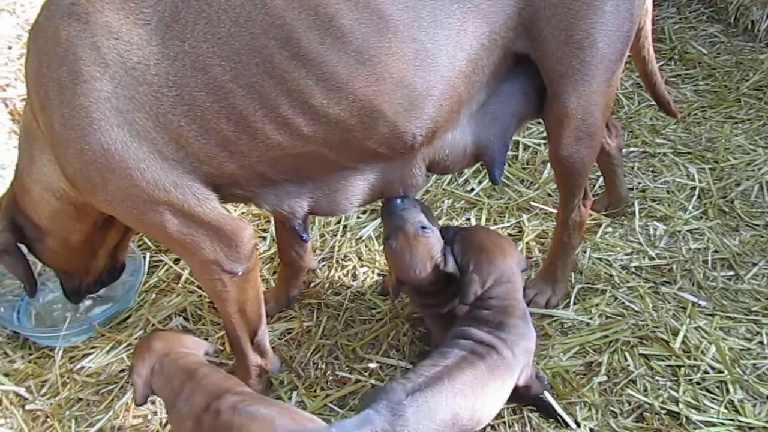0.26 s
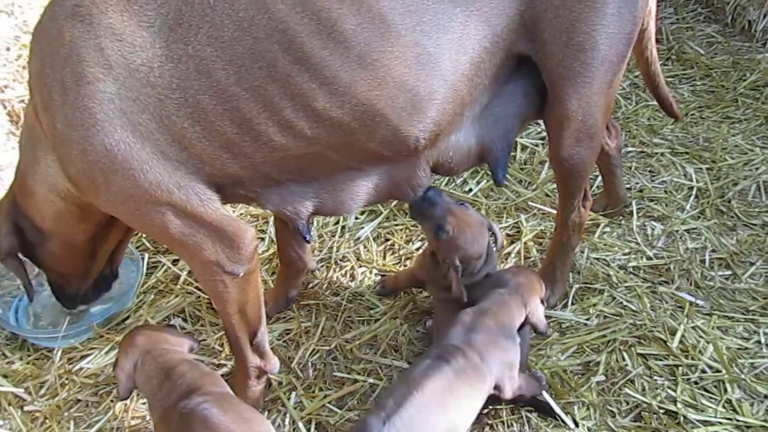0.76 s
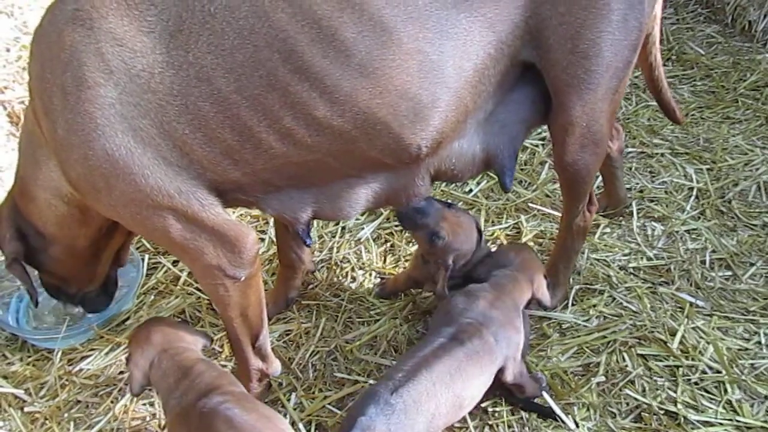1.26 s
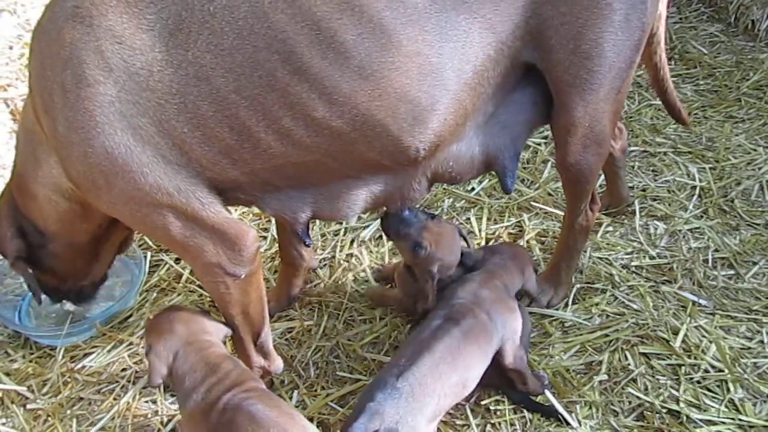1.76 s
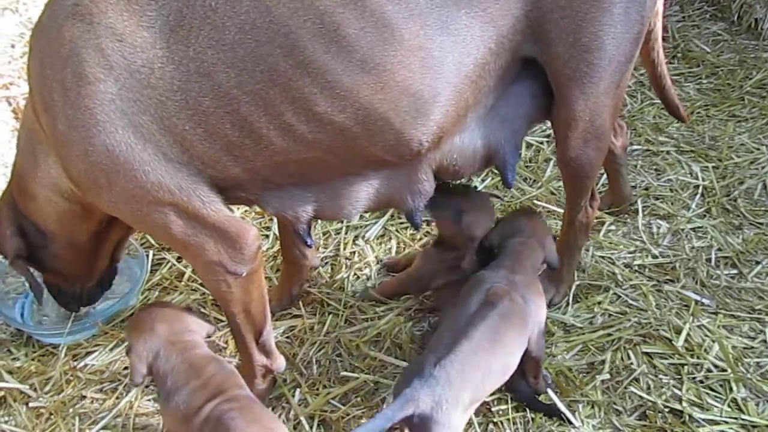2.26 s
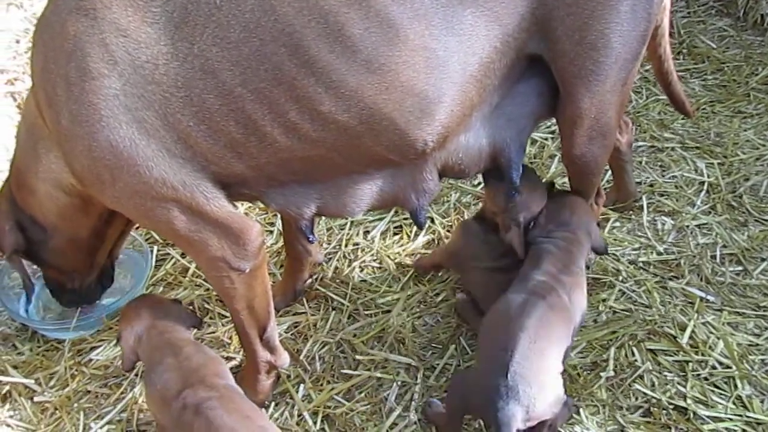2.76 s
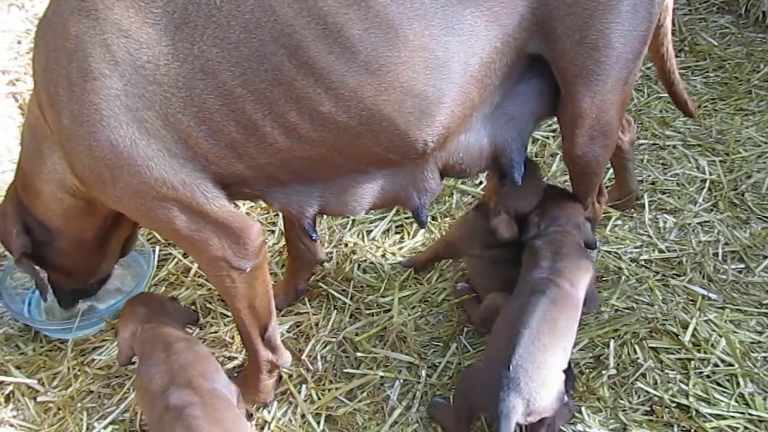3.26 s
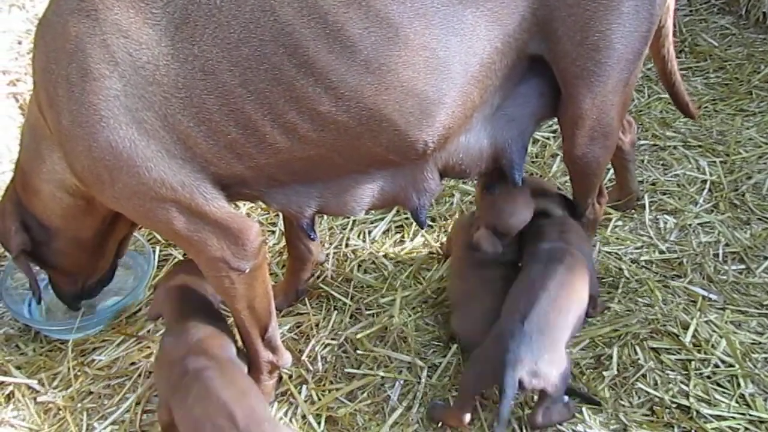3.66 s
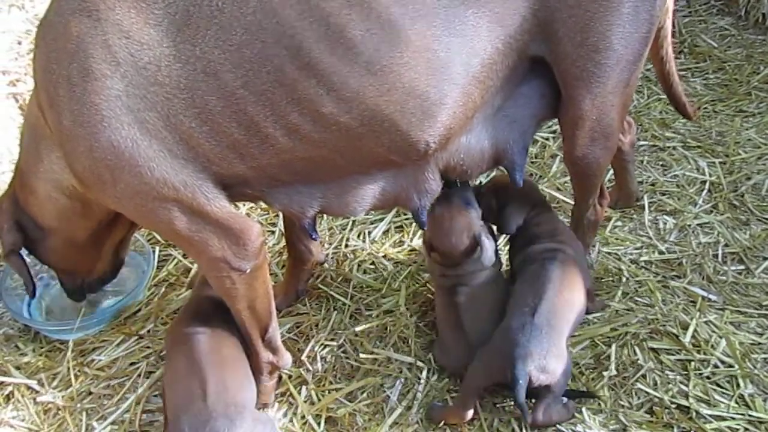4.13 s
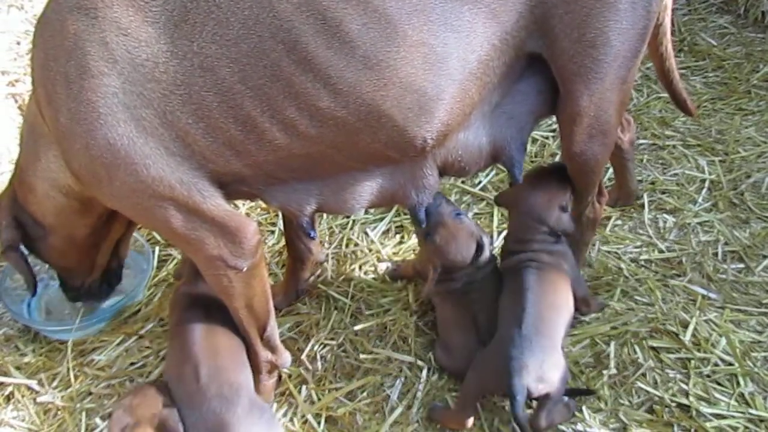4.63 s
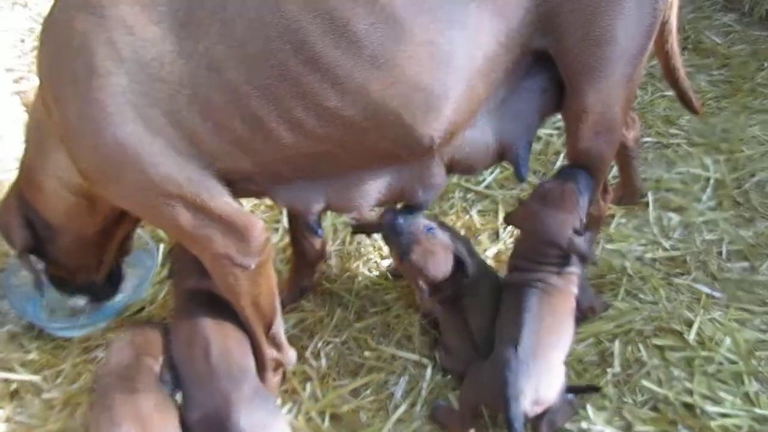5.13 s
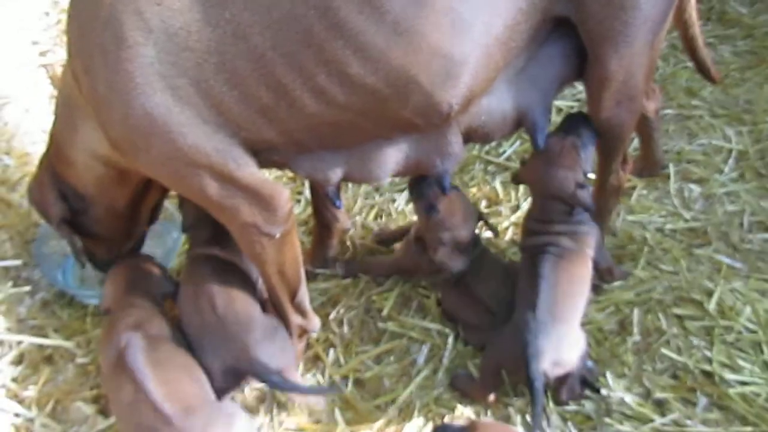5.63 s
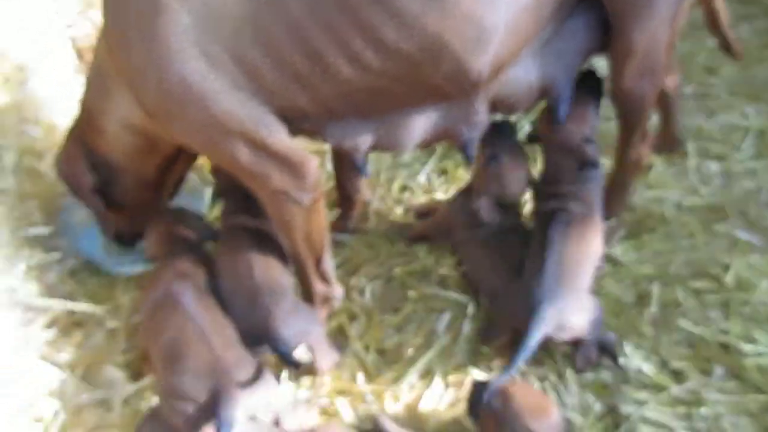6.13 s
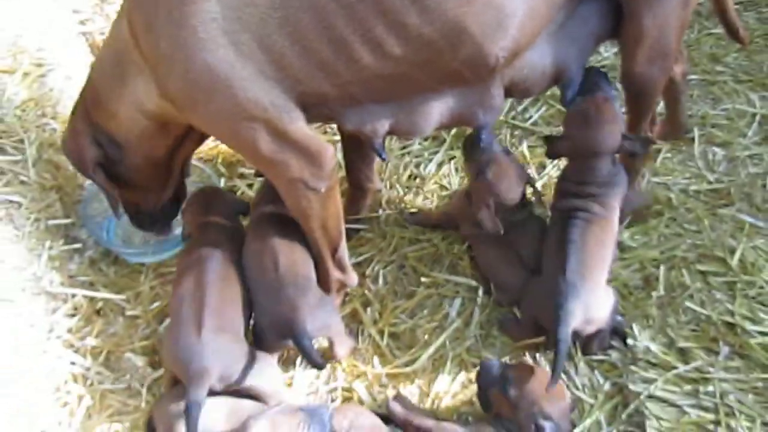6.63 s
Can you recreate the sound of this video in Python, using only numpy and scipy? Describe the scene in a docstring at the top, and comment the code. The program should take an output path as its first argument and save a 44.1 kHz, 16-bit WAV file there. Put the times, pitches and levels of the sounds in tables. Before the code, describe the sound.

A dog laps water from a plastic bowl, close and slightly left of centre, in a dry straw-bedded shed. Drinking is already under way at 0 s, with crisp splashes and plops at 0.1-0.25 s, then a short lull. From about 0.5 s laps come roughly every 0.35 s to the end: a swelling bubbly slosh with fine spray, then clustered hollow plops, wet slaps and sticky lip smacks, and a faint low gulp. Stronger splashes fall near 0.9, 1.7, 2.9, 4.05, 5.3 and 6.1 s; other laps are lighter, with brief settling between. Thin dry straw rustle from treading puppies flickers across both sides, a bit clearer around 2.6 s and 6.2 s. Soft, slowly swelling air noise lies beneath. After 6.4 s the lapping thins to small bubbling, with a last plop and splash near 6.9 s.

```python
"""Quick wet laps come first: a dog drinks from a plastic bowl in a straw-bedded shed, close to two microphones.
Ringing air pockets make the plops and glugs; shaped noise bursts make the splashes and lip smacks.
A slosh of tiny bubbles and spray swells with every lap, and low pitched pushes mark the mouthfuls.
Behind it, filtered noise gives the rustle of straw under treading puppies and the soft shed air.
"""
import sys
import numpy as np
from scipy import signal
from scipy.fft import rfft, irfft, next_fast_len
from scipy.io import wavfile
from scipy.ndimage import uniform_filter1d

SR = 44100
rng = np.random.default_rng(int(sys.argv[2]) if len(sys.argv) > 2 else 0)


def digitize_waveform(pressure):
    """Quantize a signal to 16-bit integers and store it at the path in sys.argv[1].

    Rows of a 2-D input are taken as channels; values are limited to [-1, 1].
    """
    field = np.atleast_2d(pressure).T
    bounded = np.clip(field, -1, 1)
    quanta = np.round(bounded * 32767).astype(np.int16)
    wavfile.write(sys.argv[1], SR, quanta)


N = 303849


def gain_of(db):
    """Turns dB into an amplitude factor."""
    return 10 ** (np.asarray(db) / 20)


def evened(x):
    """Scales a signal to an RMS of 1."""
    return x / np.sqrt(np.mean(x ** 2) + 1e-20)


def read(points, hz):
    """Reads a (Hz, value) curve on a logarithmic frequency axis."""
    f, value = np.transpose(points)
    return np.interp(np.log(hz + 1), np.log(f + 1), value)


def add(mix, s, sound):
    """Lays a sound into the mix at s seconds, cut off at the end."""
    part = mix[round(s * SR):][:len(sound)]
    part += sound[:len(part)]


def coloured(x, gain):
    """Multiplies the spectrum by gain(Hz)."""
    size = next_fast_len(N + 4096)
    hz = np.fft.rfftfreq(size, 1 / SR)
    return irfft(rfft(x, size) * gain(hz), size)[..., :N]


def burst(ring_s, round_by):
    """Time axis and an envelope of peak 1: it swells for round_by ring times, then dies away."""
    ring_s = np.clip(ring_s, .0002, .012)
    t = np.arange(round(12 * ring_s * SR)) / SR
    shape = (t / ring_s + 1e-9) ** round_by * np.exp(-t / ring_s)
    return t, shape / shape.max()


def pocket(hz, ring_s, round_by, glide, wobble):
    """An air pocket rings as a sine whose pitch glides as it nears the surface and shakes with its wall."""
    t, shape = burst(ring_s, round_by)
    shake = evened(uniform_filter1d(rng.standard_normal(6400), size=60))[:len(t)]
    pitch = hz * (1 + glide * (t / ring_s - 1) + wobble * shake)
    phase = 2 * np.pi * np.cumsum(pitch) / SR
    return shape * np.sin(phase + 2 * np.pi * rng.random())


def puff(ring_s, round_by, ragged_db):
    """Noise under the pocket's kind of envelope, broken into lumps as drops land one after another."""
    shape = burst(ring_s, round_by)[1]
    noise, lumps = rng.standard_normal((2, 6400))
    lumps = gain_of(ragged_db * evened(uniform_filter1d(lumps, size=50)))
    ragged = noise * lumps / np.sqrt(np.mean(lumps ** 2))
    return shape * ragged[:len(shape)]


def grains(low_hz, high_hz, cycles, per_s, spread_db, count):
    """Random tiny pockets: each pitch rings on a differently shifted copy of one sparse, uneven train."""
    out = np.zeros(N)
    chance = rng.random(N)
    size = gain_of(spread_db * np.minimum(rng.exponential(1, N), 5))
    train = size * (chance < per_s / count / SR)
    for hz in np.geomspace(low_hz, high_hz, count):
        shifted = np.roll(train, rng.integers(N))
        ring = pocket(hz, cycles / hz, round_by=0.98, glide=0.0059, wobble=0.021)
        out += signal.oaconvolve(shifted, ring)[:N] * np.sqrt(hz)
    return out


# Air pockets trapped by the tongue, heard as plops and glugs.
# Each row: start in seconds, level in dB, pitch in Hz, ring time in seconds.
POCKETS = [(.0254, -31, 793, .0021), (.1589, -15, 1956, 0.0015), (0.214, -19.5, 2560, 0.00078),
           (0.225, -20.5, 2000, 0.001), (0.249, -40.5, 354, 0.0052), (0.407, -43.5, 2600, 0.0019),
           (0.528, -36.5, 1157, 0.0047), (.5467, -30, 1170, 0.00063), (0.5566, -38, 480, 0.0037),
           (0.5537, -33.5, 1740, 0.0048), (.6161, -30.5, 1720, .003), (0.644, -30, 2470, 0.0015),
           (0.688, -36.5, 340, 0.0049), (0.703, -39, 324, .0048), (.7246, -30, 1450, .0009),
           (0.8728, -31, 2190, 0.0025), (0.874, -23.5, 1340, 0.00064), (0.9013, -28.5, 1110, .0016),
           (.91, -32, 394, 0.0028), (0.9192, -13.5, 1580, .00075), (0.9472, -23.5, 2820, 0.00061),
           (.9693, -13, 1610, 0.0022), (0.9694, -31, 453, 0.0026), (.996, -39, 490, .0035),
           (1.025, -27, 1750, 0.00098), (1.056, -31.5, 426, 0.0014), (1.212, -37, 1220, 0.0024),
           (1.2607, -27, 1090, 0.0019), (1.2743, -27, 1580, .00081), (1.337, -22.5, 1380, 0.00082),
           (1.364, -27, 436, 0.0021), (1.372, -26, 1120, .002), (1.3758, -30.5, 2550, 0.0021),
           (1.644, -34.5, 810, 0.0029), (1.7034, -22, 1000, 0.00089), (1.7127, -30.5, 476, 0.0024),
           (1.7765, -24, 1610, 0.0023), (1.8242, -31.5, 1230, .0015), (1.8498, -28, 1170, 0.00098),
           (1.872, -23.5, 2800, 0.00046), (1.985, -30, 2340, 0.0012), (2.045, -32, 1060, .0016),
           (2.0522, -37, 510, .008), (2.077, -32, 1700, 0.0019), (2.0936, -21.5, 2890, 0.0011),
           (2.0989, -26, 1770, .0011), (2.109, -27, 2760, .0015), (2.1421, -24, 372, 0.0019),
           (2.1659, -30.5, 390, 0.0012), (2.3518, -19, 1155, 0.0026), (2.3984, -22, 3240, 0.00043),
           (2.4416, -27, 2140, 0.0022), (2.4485, -31, 2750, 0.0072), (2.4527, -35, 532, 0.0041),
           (2.4598, -32.5, 1480, 0.006), (2.501, -31.5, 1176, 0.0028), (2.5381, -22.5, 1090, 0.0019),
           (2.7835, -33, 2200, 0.001), (2.8335, -30, 2720, 0.0021), (2.8336, -27, 830, .0023),
           (2.8434, -29.5, 2050, 0.0015), (2.9076, -31, 2000, 0.0017), (2.918, -38, 3047, 0.0078),
           (2.9323, -27, 1150, 0.004), (2.961, -26.5, 795, 0.003), (2.9772, -25.5, 2590, 0.0013),
           (2.9775, -21.5, 1190, 0.0034), (3.0944, -28.5, 1870, 0.0014), (3.099, -26.7, 1222, 0.0024),
           (3.1333, -30.5, 1940, .0013), (3.1698, -31, 1490, 0.0025), (3.1975, -33, 504, 0.005),
           (3.2239, -24, 2100, 0.0023), (3.3163, -32, 452, .0051), (3.3192, -24, 910, 0.0027),
           (3.515, -36, 2660, 0.006), (3.544, -24.5, 3360, .0013), (3.5746, -30, 2620, 0.00085),
           (3.629, -32, 423, 0.00099), (3.665, -26, 857, 0.003), (3.9353, -35, 1450, 0.0018),
           (3.965, -29.5, 740, .0025), (3.983, -29, 2040, 0.0014), (4.0156, -28, 1570, 0.0016),
           (4.041, -21.5, 2740, 0.00082), (4.043, -20.5, 1510, 0.00074), (4.066, -23, 1260, .002),
           (4.0969, -32, 2390, 0.0015), (4.1088, -25, 1170, 0.0016), (4.129, -34.5, 477, 0.0026),
           (4.234, -32.5, 1490, 0.0021), (4.277, -40, 2780, .0015), (4.284, -37.5, 1190, 0.0022),
           (4.3198, -35.5, 707, 0.0038), (4.37, -24, 3000, 0.00028), (4.376, -31, 1445, 0.0055),
           (4.4509, -27.5, 457, 0.0017), (4.4529, -19.5, 1185, 0.0016), (4.582, -40, 2720, 0.0014),
           (4.6885, -35.5, 2720, 0.0016), (4.7283, -35, 1670, 0.0022), (4.7932, -32, 367, 0.0013),
           (4.8186, -30.5, 775, 0.0013), (4.859, -37, 1390, 0.00098), (4.8706, -36, 1510, 0.0013),
           (5.0805, -32, 1950, 0.0043), (5.143, -30, 2680, 0.0031), (5.1476, -33.5, 810, 0.0024),
           (5.1544, -34.5, 1660, 0.0044), (5.218, -24.5, 3110, 0.0042), (5.278, -32, 433, 0.0013),
           (5.2796, -16, 1140, 0.0024), (5.2857, -18.5, 2720, 0.0014), (5.3007, -27, 2800, .0011),
           (5.392, -23.5, 1990, 0.0014), (5.423, -33.5, 1416, 0.0037), (5.4533, -25.5, 1440, 0.00061),
           (5.485, -35, 2150, 0.0049), (5.242, -36, 495, 0.0019), (5.2476, -35, 1380, .0018),
           (5.4845, -32, 555, .0036), (5.557, -34, 1390, .0013), (5.605, -32, 2980, 0.0012),
           (5.6246, -35, 430, 0.0017), (5.8761, -18.5, 1560, 0.00064), (5.9334, -29, 836, 0.0033),
           (5.9625, -29, 2050, 0.0023), (6.0104, -26.5, 1360, 0.0011), (6.085, -33.5, 503, .0023),
           (6.0887, -23.5, 1173, 0.0025), (6.1064, -31, 1140, 0.0029), (6.1248, -27, 1350, 0.0019),
           (6.2083, -23, 2720, 0.0021), (6.211, -22.5, 1340, 0.0012), (6.2545, -37, 917, 0.008),
           (6.286, -29, 1830, 0.00076), (6.303, -34.5, 508, .0034), (6.303, -32.5, 893, .0033),
           (6.332, -31.5, 1460, 0.0028), (6.391, -30.5, 368, 0.002), (6.586, -40, 1226, 0.0056),
           (6.6408, -36.5, 1294, 0.0041), (6.705, -39, 1156, .004), (6.762, -36.5, 1240, .001),
           (6.808, -44, 2970, .003), (6.876, -29, 1690, .0036)]


def plops():
    """Each trapped pocket rings on its own, most of them climbing in pitch by a different amount."""
    out = np.zeros(N)
    glides = rng.uniform(-.01, .045, len(POCKETS))
    for (s, db, hz, ring_s), glide in zip(POCKETS, glides):
        add(out, s, gain_of(db) * pocket(hz, ring_s, round_by=.9, glide=glide, wobble=.04))
    return out


# Water slapped aside by the tongue. Each row: start in seconds, level in dB before colouring.
SPLASHES = [(.024, -30.5), (.111, -24), (.159, -20.5), (.212, -20.5), (0.616, -34), (0.645, -35),
            (0.918, -15.5), (.969, -40), (1.021, -33), (1.261, -21.5), (1.339, -25.5), (1.375, -25),
            (1.704, -17), (1.776, -23.5), (1.85, -27), (1.986, -31), (2.045, -26), (2.091, -23.5),
            (2.14, -26), (2.353, -35), (2.399, -27), (2.436, -27.5), (2.501, -25.5), (2.539, -27),
            (2.737, -39), (2.765, -29), (2.83, -25.5), (2.909, -19.5), (2.977, -19), (3.096, -41),
            (3.172, -26), (3.225, -23.5), (3.32, -35), (3.516, -28.5), (3.666, -31), (3.881, -33),
            (3.965, -33), (4.041, -16), (4.109, -32), (4.234, -26.5), (4.319, -22.5), (4.367, -23.5),
            (4.416, -22.5), (4.452, -24), (4.684, -24), (4.817, -50), (5.034, -33.5), (5.081, -33),
            (5.142, -21), (5.222, -24.5), (5.279, -18), (5.393, -27), (5.596, -23), (5.877, -29),
            (5.934, -32), (6.011, -23), (6.088, -19.5), (6.123, -33), (6.208, -27.5), (6.287, -33),
            (6.877, -28)]
# Colour of the splash noise. Each row: frequency in Hz, relative level in dB.
SPLASH_COLOUR = [(120, -32), (300, -5.5), (800, 1), (1500, 5), (3000, 0.5), (5000, -10.5), (9000, -17),
                 (15000, -45)]
SPLASH_RING_S = 0.006


def splashes():
    """Slapped water bursts into many drops: short coloured puffs of noise."""
    out = np.zeros(N)
    for s, db in SPLASHES:
        add(out, s, gain_of(db) * puff(SPLASH_RING_S, round_by=0.71, ragged_db=0.5))
    return coloured(out, lambda hz: gain_of(-7 + read(SPLASH_COLOUR, hz)))


# Bubbles per splash, their top level against the splash row, the range below it, and their latest start.
FREED, FREED_DB, FREED_SCATTER_DB, FREED_WITHIN_S = 8, -15, 10, .032
FREED_LOW_HZ, FREED_HIGH_HZ = 950, 3500


def freed():
    """Every splash sets free a few bubbles of random size that ring on just after it."""
    out = np.zeros(N)
    for (s, db), draws in zip(SPLASHES, rng.random((len(SPLASHES), FREED, 4))):
        for late, weak, small, long in draws:
            hz = FREED_LOW_HZ * (FREED_HIGH_HZ / FREED_LOW_HZ) ** small
            ring = pocket(hz, (2 + 5 * long) / hz, round_by=.9, glide=.03 * long, wobble=.04)
            level_db = db + FREED_DB - FREED_SCATTER_DB * weak
            add(out, s + FREED_WITHIN_S * late ** 2, gain_of(level_db) * ring)  # most come early
    return out


# Wet films tearing at lips and tongue.
# Each row: start in seconds, level in dB that the smack's layers are set against, colour in Hz.
SMACKS = [(0.1064, -31.5, 4630), (0.165, -26, 5110), (0.2186, -18.5, 5320), (.3461, -43, 5670),
          (0.529, -32, 6600), (0.613, -23, 4670), (.646, -27.5, 4900), (0.7, -30.5, 4320),
          (0.914, -33, 5680), (1.0046, -34.5, 5820), (1.2283, -41, 5170), (1.3368, -31, 5950),
          (1.366, -27, 5600), (1.42, -34.5, 5440), (1.703, -23.5, 6650), (1.8204, -30, 7150),
          (1.8355, -23.5, 6550), (2.0944, -22, 4890), (2.351, -34.5, 8100), (2.3963, -25.5, 5230),
          (2.45, -23.5, 4490), (2.5022, -30, 4940), (2.5363, -28.5, 4590), (2.6157, -33.5, 8000),
          (2.732, -36.5, 5750), (2.8455, -26.5, 5140), (2.9598, -31.5, 6900), (2.9806, -28, 9800),
          (3.066, -36, 4670), (3.183, -30, 5380), (3.204, -28, 6510), (3.2292, -25.5, 4330),
          (3.253, -28, 5240), (3.2784, -30, 5000), (3.5259, -29, 5200), (3.5864, -23, 5670),
          (3.625, -29.5, 5660), (3.7605, -35, 4600), (3.8707, -35.5, 5280), (3.982, -34.5, 6200),
          (4.0407, -24.5, 8520), (4.063, -27.5, 5840), (4.0874, -25.5, 6590), (4.3166, -28, 4610),
          (4.365, -29, 4770), (4.419, -29, 5940), (4.452, -33.5, 5960), (4.491, -34.5, 8040),
          (4.677, -30.5, 5120), (4.771, -29, 5700), (4.8153, -31, 8170), (5.146, -27.5, 6180),
          (5.2223, -29.5, 5400), (5.279, -33, 9100), (5.5603, -32, 8080), (5.5947, -27.5, 5530),
          (5.8134, -36, 5040), (5.873, -35.5, 5860), (6.0278, -29.5, 6830), (6.3022, -33, 9500),
          (6.3364, -36, 5470), (6.3878, -28, 4720)]
# Brightness of the spray, used at about half depth on the smacks. Each row: frequency in Hz, relative level in dB.
SPRAY = [(2120, 3), (3600, 8), (4040, -7), (5140, -5.5), (9470, -11), (12200, -22), (13500, -49),
         (15600, -63)]


def smacks():
    """A tearing film gives a ragged crack of noise, strongest near its own colour, with a short ring there."""
    out = np.zeros(N)
    for s, db, hz in SMACKS:
        crack = puff(0.0035, round_by=1.02, ragged_db=5.5)
        carrier = np.cos(2 * np.pi * hz * np.arange(len(crack)) / SR)
        near = uniform_filter1d(crack, size=9) * carrier  # shifts dull noise up to the colour
        add(out, s, gain_of(db - 9) * crack + gain_of(db + 1.5) * near)
        add(out, s, gain_of(db - 18) * puff(0.012, round_by=0.57, ragged_db=4))  # longer tail of droplets
        add(out, s, gain_of(db - 4.5) * pocket(hz, 0.0017, round_by=0.43, glide=0.04, wobble=0.026))
    # The low end rolls off below 3 kHz.
    return coloured(out, lambda hz: gain_of(0.48 * read(SPRAY, hz)) / (1 + (3000 / (hz + 1)) ** 6))


# Dull pushes as the jaws shut on each mouthful. Each row: start in seconds, level in dB, pitch in Hz.
GULPS = [(0.22, -44, 164), (0.681, -39, 186), (1.358, -41.5, 170), (1.827, -40.5, 195), (2.136, -39, 177),
         (2.514, -40, 187), (2.961, -36, 188), (3.279, -39, 195), (3.623, -43, 164), (4.089, -45, 220),
         (4.417, -41, 192), (4.787, -45, 169), (5.257, -39.5, 208), (5.609, -44, 190), (6.066, -39, 192),
         (6.416, -41.5, 170), (6.804, -45.5, 188)]
GULP_RING_S = 0.0088


def gulps():
    """The jaws push the water: a short low ring of very unsteady pitch."""
    out = np.zeros(N)
    for s, db, hz in GULPS:
        add(out, s, gain_of(db) * pocket(hz, GULP_RING_S, round_by=0.56, glide=0.0073, wobble=0.16))
    return out


# Laps of the tongue. Each row: start in seconds, length in seconds, bubbling level in dB, spray level in dB,
# bubbling level in dB as the water settles afterwards.
LAPS = [(-.2, 0.18, -42.5, -54, -55), (0.091, 0.14, -44, -48, -59.5), (0.481, .25, -43, -52.5, -67),
        (0.85, 0.18, -44, -52.5, -59), (1.191, 0.22, -45.5, -53, -73), (1.604, .26, -46, -49, -57),
        (1.958, 0.22, -47, -48, -60), (2.31, 0.24, -49, -51, -62), (2.731, 0.26, -46, -57, -52),
        (3.093, 0.22, -46, -51.5, -66), (3.44, .23, -45.5, -51.5, -55.5), (3.93, 0.18, -40.5, -50, -54.5),
        (4.25, 0.22, -52.5, -52.5, -56), (4.632, 0.228, -47, -54, -56), (5.086, 0.23, -47, -47, -54),
        (5.39, 0.23, -46, -51, -57), (5.882, 0.22, -45.5, -47.5, -57.5), (6.212, 0.22, -46.5, -51.5, -59),
        (6.59, 0.59, -48.5, -51.5, -57)]


def lapping_db(peak_db, rise_s, climb_db, fall_db_s, rest_db):
    """Level in dB: each lap rises from rest, climbs to its peak as the mouth fills, then falls back to rest."""
    t = np.arange(0, N + 64, 64) / SR
    ends = np.array([start + length for start, length, *_ in LAPS])
    level_db = np.interp(t, ends, rest_db * np.ones(len(LAPS)))
    for (start, *_), end, db in zip(LAPS, ends, peak_db):
        times = [start - rise_s, start, end, end + 1]
        lap_db = np.interp(t, times, [-70, db - climb_db, db, db - fall_db_s])
        level_db = np.maximum(level_db, lap_db)
    return np.interp(np.arange(N) / SR, t, level_db)


# Colour of the bubbling water. Each row: frequency in Hz, relative level in dB.
BUBBLES = [(150, -14.5), (300, -11), (500, -8), (650, -13.5), (1200, -6), (1700, -4), (2500, -4),
           (3300, -7.5), (4400, -18.5), (5500, -32)]
BUBBLE_RISE_S, BUBBLE_CLIMB_DB, BUBBLE_FALL_DB_S = 0.028, 6, 235
SPRAY_RISE_S, SPRAY_CLIMB_DB, SPRAY_FALL_DB_S, SPRAY_REST_DB = 0.033, 4.5, 166, -67.5
PLIPS_DB, PLIPS_PER_S = 1, 220  # small stray pockets, level over the bubbles
CLUMP_DB, CLUMP_HZ = 3.5, 22  # depth and speed of the clumping of bubbles and spray


def slosh():
    """Calm water mostly hisses; harder stirring brings out separate bubbles, and spray has its own level."""
    bubbling_db, spray_db, settled_db = np.transpose(LAPS)[2:]
    stir_db = lapping_db(bubbling_db, BUBBLE_RISE_S, BUBBLE_CLIMB_DB, BUBBLE_FALL_DB_S, settled_db)
    bubbly = np.clip((stir_db + 58) / 10, .15, .9)  # bubbles' share of the power

    def bubble_gain(hz):
        """Colour shared by bubbles, plips and hiss."""
        return gain_of(read(BUBBLES, hz))

    bubbles = evened(grains(150, 4400, cycles=5.0, per_s=1800, spread_db=3.1, count=44))
    bubbles = evened(coloured(bubbles, bubble_gain))
    plips = grains(401.5, 3630, cycles=2.25, per_s=PLIPS_PER_S, spread_db=3.5, count=24)
    plips = evened(coloured(plips, bubble_gain))
    hiss = evened(coloured(rng.standard_normal(N), bubble_gain))
    water = np.sqrt(bubbly) * (bubbles + gain_of(PLIPS_DB) * plips) + np.sqrt(1 - bubbly) * hiss

    spray = grains(3623, 15030, cycles=2.8, per_s=2600, spread_db=4.0, count=16)
    # Small drops are many, so the treble is lifted.
    spray = evened(coloured(spray, lambda hz: gain_of(read(SPRAY, hz)) * np.sqrt(hz)))
    spray_db = lapping_db(spray_db, SPRAY_RISE_S, SPRAY_CLIMB_DB, SPRAY_FALL_DB_S, SPRAY_REST_DB)

    slow_noise = coloured(rng.standard_normal(N), lambda hz: 1 / (1 + (hz / CLUMP_HZ) ** 2))
    clumps = evened(gain_of(CLUMP_DB * evened(slow_noise)))
    return clumps * (gain_of(stir_db) * water + gain_of(spray_db) * spray)


# Colour of the returned sound. Each row: frequency in Hz, level in dB.
SHED = [(150, -23), (600, -19), (2000, -15), (5000, -5.5), (12000, -7.5)]


def shed(x):
    """Bowl wall and shed send back sparse taps, other ones to each microphone, soaked up fast by straw."""
    t = np.arange(6000) / SR
    signs = rng.choice([-1., 1.], (2, 6000))
    taps = signs * (rng.random((2, 6000)) < .05) * (t > .003)
    # Two decays: 60 dB in 0.15 s, and a weaker one of 60 dB in 0.2 s.
    tail = taps * (gain_of(-60 * t / 0.15) + gain_of(-24 - 60 * t / 0.2))
    back = signal.fftconvolve(x[None], tail / np.linalg.norm(tail[0]), axes=1)[:, :N]
    return coloured(back, lambda hz: gain_of(read(SHED, hz)))


# Puppies treading the straw. Each row: time in seconds, rustle level in dB, joined by straight lines.
TREAD = [(0.0, -65), (0.57, -67.5), (0.73, -57.5), (1.61, -73), (1.8, -65), (2.57, -52), (2.7, -59),
         (3.09, -55), (4.62, -58.5), (6.24, -51), (6.64, -56), (6.89, -61.5)]
# Colour of the dry rustle. Each row: frequency in Hz, relative level in dB.
STRAW = [(2500, 2), (4000, -4), (5500, 0.5), (8000, 1), (11000, -8), (13500, -12), (15500, -56)]
SNAPS_DB = -5  # single stalks snapping, level against the shared rustle noise


def straw():
    """Fine dry rustle from all round, partly unlike at the two microphones, flickering as stalks slip."""
    s, db = np.transpose(TREAD)
    common, left, right, slips = rng.standard_normal((4, N))
    snaps = gain_of(SNAPS_DB) * evened(grains(3000, 14000, cycles=.6, per_s=250, spread_db=4, count=6))
    both = 1.27 * (common + snaps) + np.array([left, right])
    rustle = evened(coloured(both, lambda hz: gain_of(read(STRAW, hz))))
    flicker_db = 2.5 * evened(coloured(slips, lambda hz: 1 / (1 + (hz / 25) ** 2)))
    return gain_of(np.interp(np.arange(N) / SR, s, db) + flicker_db) * rustle


# Colour of the shed air shared by both microphones. Each row: frequency in Hz, relative level in dB.
AIR = [(15, -50), (25, -4.5), (160, 7.5), (972, 1.5), (1170, 5), (1810, -14), (2700, -43), (3940, -6),
       (4890, -18), (7520, -18.5), (12200, -35), (15600, -58)]
# Air of opposite sign at the microphones. Each row: frequency in Hz, level in dB over the shared part.
AIR_SIDE = [(60, 15.5), (110, 11), (200, 12), (380, 10), (700, 4.5), (1290, -3.5), (2380, 24), (4400, -59),
            (8120, -23), (15000, 21)]
AIR_DB = -56  # RMS level of the shared part before its slow swell


def air():
    """Soft air noise that swells slowly; its bass is mostly opposed at the two microphones."""
    common, opposed, drift = rng.standard_normal((3, N))
    common = coloured(common, lambda hz: gain_of(read(AIR, hz)))
    opposed = coloured(opposed, lambda hz: gain_of(read(AIR, hz) + read(AIR_SIDE, hz)))
    swell = gain_of(1.6 * evened(coloured(drift, lambda hz: hz < 3)))
    return gain_of(AIR_DB) / common.std() * swell * np.array([common + opposed, common - opposed])


# The bowl stands left. Each row: frequency in Hz, left over right in dB.
LEAN = [(200, 3.5), (1500, 2), (6000, 2), (14000, 2.5)]
LEAD_S = .00002  # direct sound reaches the left microphone first


def scene():
    """Places the direct water sound a little left, then adds its echoes, the straw and the air."""
    water = plops() + splashes() + freed() + gulps() + smacks() + slosh()
    sides = np.array([[.5], [-.5]])  # half the lean and lead to each side

    def placing(hz):
        """Level and time offset of each microphone."""
        return gain_of(sides * read(LEAN, hz)) * np.exp(2j * np.pi * sides * hz * LEAD_S)

    return coloured(water, placing) + shed(water) + straw() + air()


# Dip from the housing round the microphones. Each row: frequency in Hz, gain in dB.
PORT = [(3000, 1), (3600, -5), (4000, -6.5), (4400, -0.5), (5000, 2.5)]
EDGE_HZ = 15700  # top of the band


def record(dry):
    """The housing dips the presence range and the microphones lose deep bass; then the band limit."""
    thin = coloured(dry, lambda hz: gain_of(read(PORT, hz)) * hz ** 2 / (hz ** 2 + 50 ** 2))
    low_pass = signal.firwin(511, EDGE_HZ, window=("kaiser", 9), fs=SR)
    return signal.oaconvolve(thin, low_pass[None], "same")


dry = scene()
out = record(dry)
digitize_waveform(out)
```